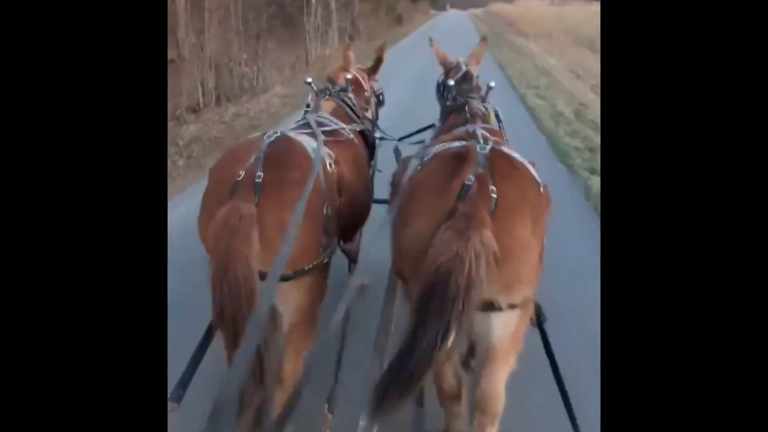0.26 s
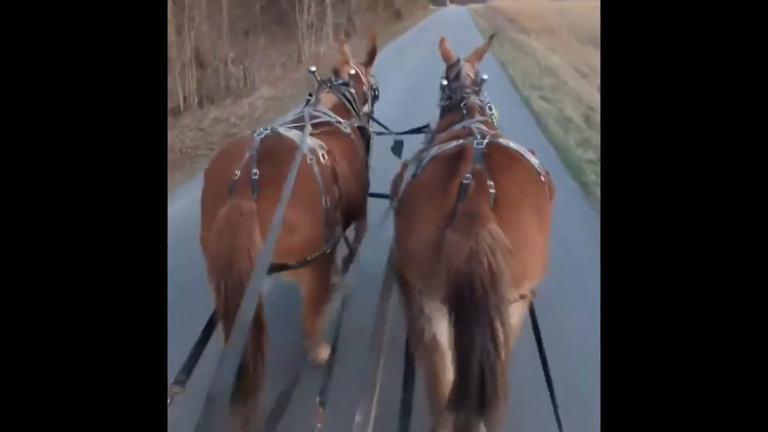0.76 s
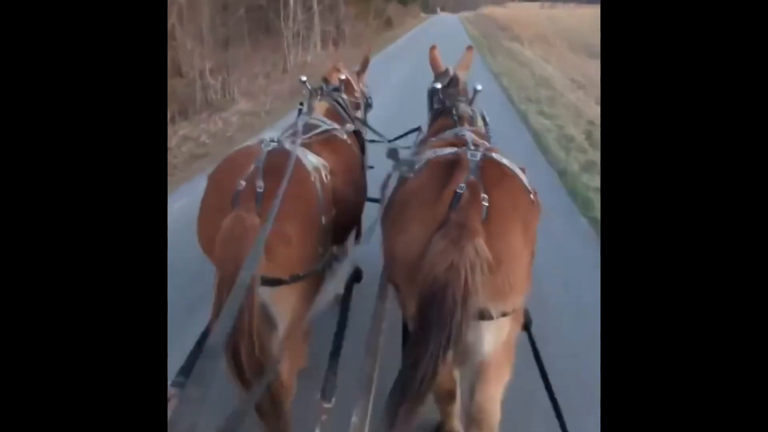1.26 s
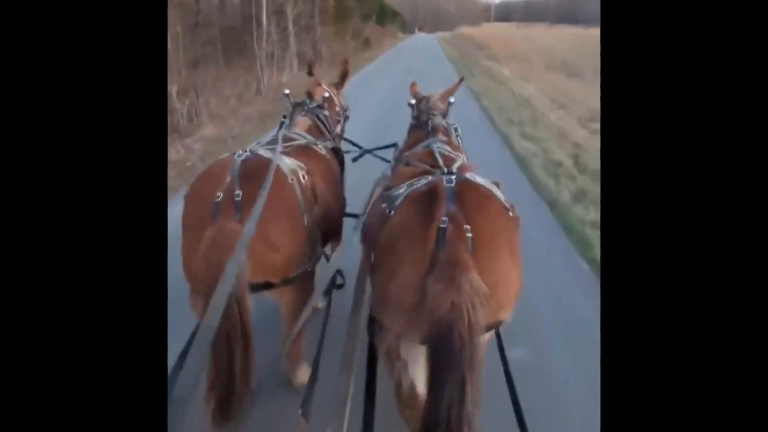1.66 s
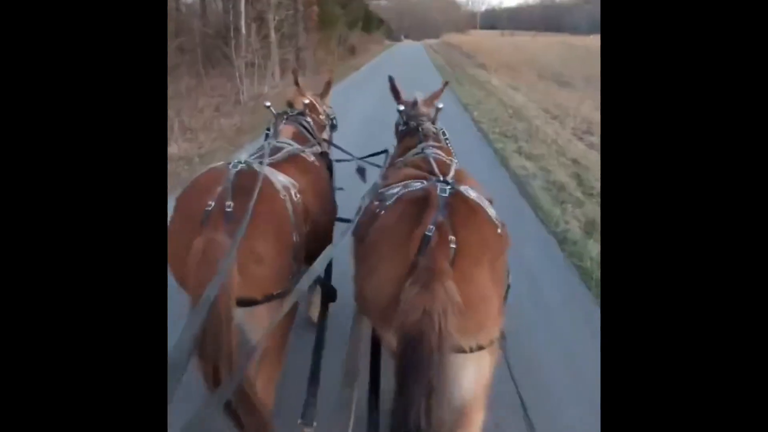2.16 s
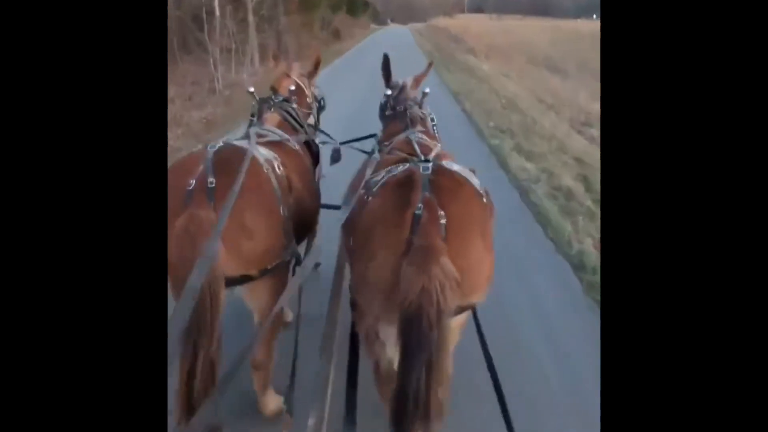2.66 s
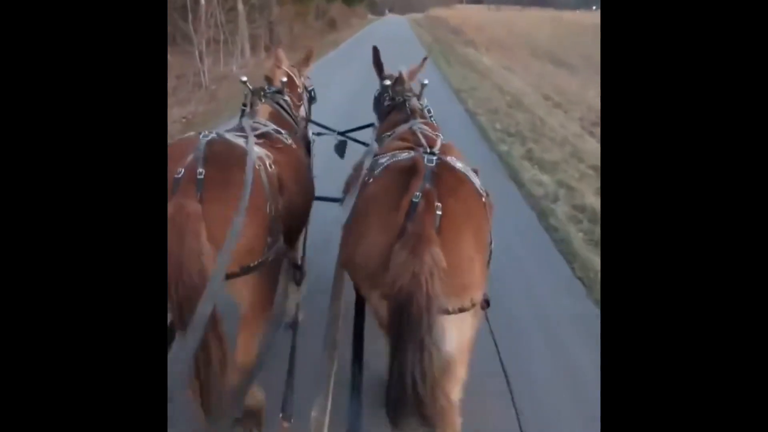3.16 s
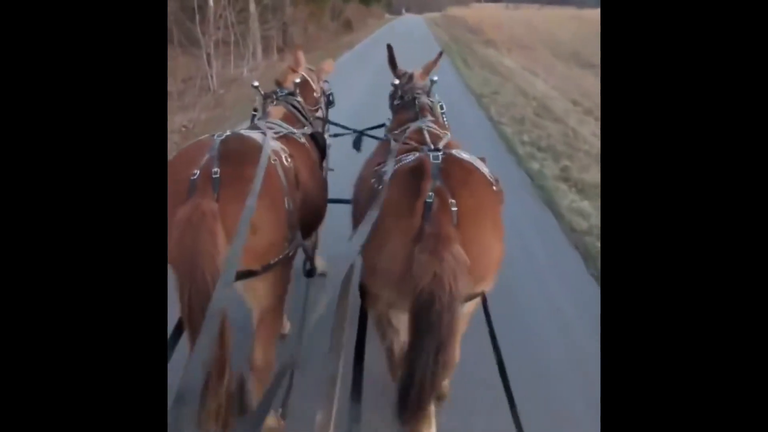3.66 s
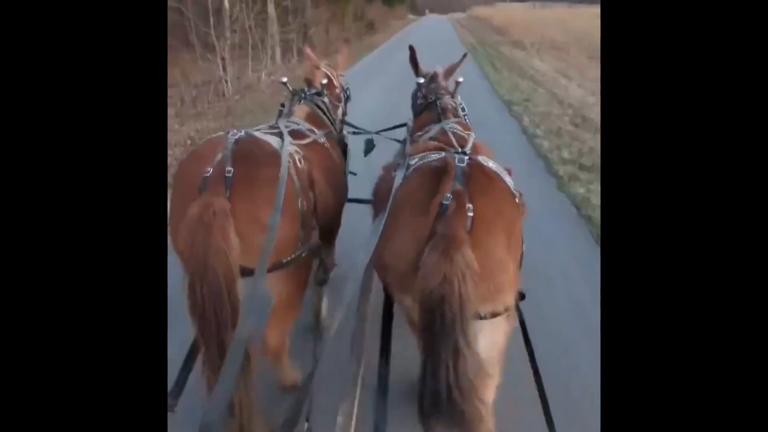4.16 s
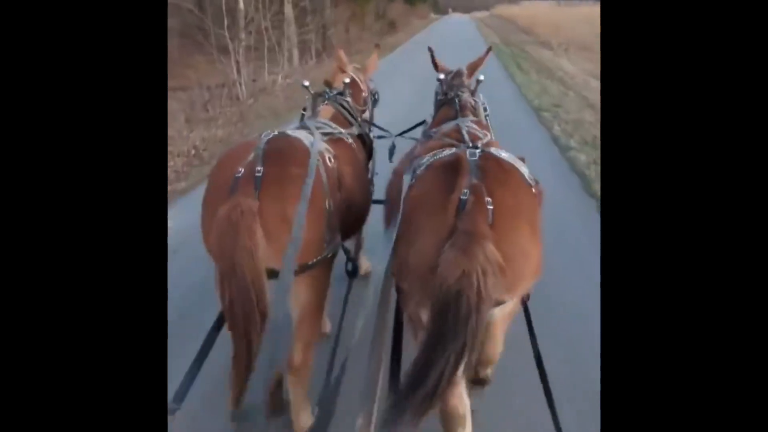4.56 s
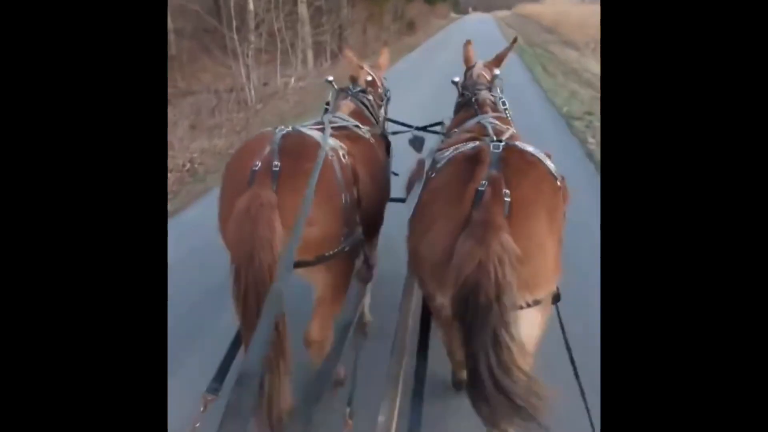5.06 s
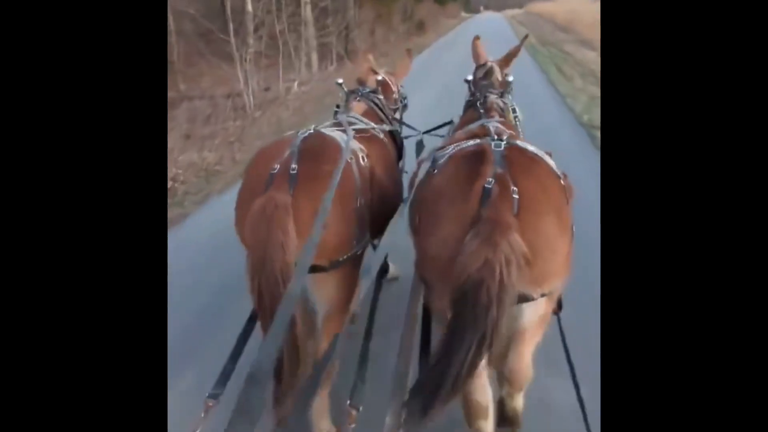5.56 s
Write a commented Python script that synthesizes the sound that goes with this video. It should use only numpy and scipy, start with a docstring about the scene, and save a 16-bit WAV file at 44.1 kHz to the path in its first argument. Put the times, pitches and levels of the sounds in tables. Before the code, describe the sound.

Close up from the cart, two shod mules trot on asphalt. Hollow, woody clops overlap in a quick, slightly uneven rhythm, with gritty skids and bright clicks of steel shoes. Wheels rumble quietly beneath and harness links tinkle. A sliding shoe squeals briefly near the start, then one hard step rings metallically around two seconds. The steps continue to the end in dry open air.

```python
"""Two shod mules trot on asphalt ahead of a cart that carries two microphones.
From the start wheels rumble and grit and harness hiss (coloured noise), and links tinkle (decaying sines).
At once the steps begin: shoes skid (noise and shoe modes), hooves clop (sines, noise), shoes click (grit noise).
At 0.8 s a sliding shoe sings (two steady close sines and a gliding partial); from 1.7 s the cart frame groans
faintly (fuzzy tones); at 1.9 s one hard blow rings a shoe (decaying steel modes). Steps go on to the end."""
import sys
import numpy as np
from scipy import signal
from scipy.fft import rfft, irfft, next_fast_len
from scipy.io import wavfile
from scipy.ndimage import uniform_filter1d

SR = 44100
rng = np.random.default_rng(int(sys.argv[2]) if len(sys.argv) > 2 else 0)


def put_to_file(sound):
    """Save the sound as 16-bit audio at rate SR, in the file named by the first command-line argument."""
    columns = np.atleast_2d(sound).T  # one column per channel
    safe = np.clip(columns, -1, 1)
    whole_steps = np.round(safe * 32767)
    wavfile.write(sys.argv[1], SR, whole_steps.astype(np.int16))


N = 255774


def amp(db):
    """Decibels to gain."""
    return 10 ** (np.asarray(db) / 20)


def evened(x):
    """Scales to rms 1."""
    return x / np.sqrt(np.mean(x ** 2) + 1e-20)


def wander(count, *sizes):
    """Slow random curve of rms 1: white noise under moving averages of the given sizes in samples."""
    x = rng.standard_normal(count)
    for size in sizes:
        x = uniform_filter1d(x, size=size)
    return evened(x)


def read(points, hz):
    """Reads a spectrum on a log-frequency axis."""
    f, value = np.transpose(points)
    return np.interp(np.log(hz + 1), np.log(f + 1), value)


def add(mix, s, sound):
    """Mixes a stereo sound in at time s."""
    part = mix[:, round(s * SR):][:, :sound.shape[1]]
    part += sound[:, :part.shape[1]]


def resonate(x, hz, width_hz):
    """Shifts the curve hz down to zero, smooths, and shifts back: a resonance of gain 1."""
    turn = np.exp(2j * np.pi * np.cumsum(hz * np.ones(x.shape[-1])) / SR)
    r = np.exp(-np.pi * width_hz / SR)
    return 2 * (turn * signal.lfilter([1 - r], [1, -r], x / turn)).real


def strike(t, rise_s, t60_s):
    """Envelope of a blow: the contact grows smoothly, then dies; top near 1."""
    rise = np.sin(np.pi / 2 * np.clip(t / rise_s, 0, 1)) ** 2
    return rise * amp(-60 * np.maximum(t - rise_s, 0) / t60_s)


def noise(colour, patchy_db, streak_db, grain_db):
    """Stereo noise of a given colour: drifting patches, narrow bands that swell and fade at random, grains."""
    # likeness of the two microphones: f/Hz, share [0-1]
    likeness = [(40, 0), (150, 1), (700, 0.4), (2000, 0.13), (3100, 0.56), (4200, 0.36), (8000, 0)]
    frames, hz = N // 256 + 5, np.fft.rfftfreq(1024, 1 / SR)
    a, b, c, d, patches, streaks = rng.standard_normal((frames, 513, 6)).T
    # axis 0 is frequency, axis 1 time
    patches = evened(uniform_filter1d(uniform_filter1d(patches, size=14, axis=0), size=5, axis=1))
    streaks = evened(uniform_filter1d(uniform_filter1d(streaks, size=2, axis=0), size=14, axis=1))
    same = np.clip(read(likeness, hz), 0, 1)[:, None]
    left = a + 1j * b
    right = same * left + np.sqrt(1 - same ** 2) * (c + 1j * d)
    lows_steady = (hz / (hz + 150))[:, None]
    gain_db = read(colour, hz)[:, None] + (patchy_db * patches + streak_db * streaks) * lows_steady
    z = np.array([left, right]) * amp(gain_db)
    hiss = signal.istft(z, nperseg=1024, noverlap=768)[1][:, :N]
    return evened(hiss * amp(grain_db * wander(N, 90)))


def steel(t, tuning=1):
    """All modes of a shoe, struck once, each at a random phase."""
    # shoe modes: f/Hz, level/dB, t60/s
    modes = [(517, -10, .22), (1876, -3, .16), (2353, -10, .1), (2632, -5.5, .3), (3852, 4, .1),
             (3954, 8, .11), (3996, 9, .1), (4040, -2, .1), (4630, 0, .12), (4714, 1, .08), (5410, -10, .5),
             (5448, -9, .4), (5468, -3, .26), (5900, -4, .13), (6380, -6, .26), (6419, -1, .19),
             (6600, -9, .25), (6800, -4, .15), (7092, -5, .11), (7327, -3, .12), (7700, -6, .12),
             (7957, -5, .22), (8044, -1, .27), (8380, -12, .12), (8970, -5, .14), (10430, -18, .2)]
    phases = rng.random(len(modes))
    return sum(amp(db - 60 * t / t60) * np.sin(2 * np.pi * (hz * tuning * t + phase))
               for (hz, db, t60), phase in zip(modes, phases))


def floor(grit):
    """Wheels rumble on the uneven road while loose grit and harness hiss."""
    # floor between steps: t/s, mean wheel rumble level/dB, grit and harness level/dB
    levels = [(0.0, -58, -64), (0.11, -45, -51), (0.58, -51, -48), (0.95, -50, -50), (1.24, -49.5, -46),
              (1.32, -46.5, -52.5), (1.45, -50, -44.5), (1.71, -49.5, -74), (1.84, -53.5, -55),
              (2.1, -44, -55), (2.39, -47, -43.5), (2.55, -46.5, -46.5), (2.99, -42.5, -47),
              (3.12, -44.5, -47), (3.39, -50, -53), (3.78, -46, -50), (3.91, -49.5, -50),
              (4.23, -50.5, -48.5), (4.59, -47, -54.5), (4.75, -47, -51.5), (4.94, -48, -48),
              (5.3, -48, -50.5), (5.64, -46.5, -45.5), (5.8, -54, -86)]
    # wheel rumble spectrum: f/Hz, relative level/dB per Hz
    rumble_colour = [(12, -46), (30, -15), (70, 2.5), (138, -6), (256, 2.5), (585, -5), (771, -3),
                     (1460, -6.5), (1920, -4), (2530, -16), (3200, -26.5), (4160, -55), (7040, -120)]
    s, rumble_db, grit_db = np.transpose(levels)
    t = np.arange(N) / SR
    rumble = noise(rumble_colour, patchy_db=4.5, streak_db=5.5, grain_db=1.0)
    lumps_db = 3.1 * wander(N, 1200, 1200)  # uneven road
    return amp(np.interp(t, s, rumble_db) + lumps_db) * rumble + amp(np.interp(t, s, grit_db)) * grit


def harness(per_s, db):
    """Buckles and chain links tinkle: short high pings of uneven size."""
    out, t = np.zeros((2, N)), np.arange(6000) / SR
    size = amp(np.minimum(rng.exponential(1, N), 4)) * (rng.random(N) < per_s / SR)
    link = rng.integers(0, 26, N)
    for k, (u, v) in enumerate(rng.random((26, 2))):
        ping = np.sin(2 * np.pi * (3500 + 6500 * u) * t) * strike(t, 0.012, 0.08 + 0.15 * v)
        out[k % 2] += signal.oaconvolve(size * (link == k), ping)[:N]
    return amp(db) * evened(out + 0.059 * out[::-1])  # slight leak to the other side


def skids(body, knock, grit):
    """Sliding steel drives hoof body, stone and snapping grit together, and stops short or dies away."""
    # skids: start t/s, turning point t/s, end t/s, then at the turning point hoof body level/dB,
    # knock level/dB and grit level/dB, last fade from there to the end/dB (negative: still growing)
    slides = [(0.027, 0.066, 0.12, -38, -35, -33, 15.5), (0.259, 0.297, 0.32, -40, -37.5, -43.5, 27),
              (0.359, 0.381, 0.43, -34, -29.5, -31.5, 18), (0.552, 0.586, 0.7, -31, -35.5, -41.5, 24),
              (0.792, 0.829, 0.94, -30, -38.5, -42.5, 44), (1.024, 1.065, 1.193, -34, -33, -34, 14.5),
              (1.181, 1.216, 1.37, -47.5, -47, -47, 3), (1.604, 1.633, 1.756, -33.5, -39, -34.5, 20),
              (1.846, 1.872, 2.08, -45, -38.5, -41, 30), (1.91, 1.917, 1.935, -40, -27, -21.5, 1.5),
              (1.926, 1.93, 2.08, -30.5, -37, -29.5, 26), (2.129, 2.144, 2.182, -39.5, -43, -33.5, -2),
              (2.396, 2.465, 2.46, -42, -43, -43, -6), (2.629, 2.659, 2.73, -30.5, -40, -37, 13.5),
              (2.73, 2.741, 2.77, -67, -36, -37, 36), (3.101, 3.139, 3.196, -32.5, -36, -35, 5.5),
              (3.323, 3.342, 3.5, -46.5, -51, -44, 10.5), (3.614, 3.631, 3.701, -36, -34, -30, 1),
              (3.696, 3.699, 3.81, -58, -45.5, -37, 17), (4.115, 4.134, 4.207, -37, -34, -36.5, 7),
              (4.196, 4.186, 4.38, -53, -46.5, -66, 12), (4.351, 4.366, 4.36, -29, -37, -39, -8),
              (5.193, 5.198, 5.34, -33, -34, -38.5, 23.5), (5.724, 5.753, 5.8, -34.5, -38.5, -33.5, 8)]
    swell_db = (12, 18, 15)  # growth from first touch to turning point: body, knock, grit
    shoe_spread, shoe_t60_s = 0.06, 0.059  # pitch varies by this share; extra damping by the road
    ring_db = -2.5  # ringing shoe re grit
    sing_hz, sing_width_hz, sing_db = (5250, 5800), 1100, -7  # climbing hiss band, level re grit
    tick_db = 2.5  # unevenness of the snapping grit
    grains_per_s, grain_db, grain_s = 450, -2.5, 0.0013  # cracking stones: rate, gain over hiss, life
    out, held = np.zeros((2, N)), np.arange(2500) / SR
    for start, turn, end, *levels_db, fade_db in slides:
        at = slice(round(start * SR), min(round(end * SR), N))
        t = np.arange(at.start, at.stop) / SR
        ends = np.clip(np.minimum(t - start, end - t) / 0.0033, 0, 1)
        shoe = steel(held, 1 + shoe_spread * (2 * rng.random() - 1)) * amp(-60 * held / shoe_t60_s)

        count = len(t) + len(held)  # lead-in for the ringing
        snaps = amp(tick_db * np.tanh(wander(count, 60)))
        stones = (rng.random(count) < grains_per_s / SR) * np.minimum(rng.exponential(1, count), 2.2)
        cracks = signal.lfilter([1], [1, -np.exp(-1 / (grain_s * SR))], stones)
        snaps = snaps * (1 + amp(grain_db) * cracks)
        drive = snaps * rng.standard_normal((1, count))
        ringing = signal.fftconvolve(drive, shoe[None], "valid")[:, :len(t)]

        snaps = snaps[len(held):]
        crackle = grit[:, at] * snaps
        singing = resonate(crackle, np.interp(t, (start, end), sing_hz), sing_width_hz)
        bright = evened(crackle) + amp(ring_db) * evened(ringing) + amp(sing_db) * evened(singing)
        layers = (body[:, at] * np.sqrt(snaps), knock[:, at] * snaps, bright)
        for db, grow_db, layer in zip(levels_db, swell_db, layers):
            level_db = db - np.interp(t, (start, turn, end), (grow_db, 0, fade_db))
            out[:, at] += amp(level_db) * ends * evened(layer)
    return out


def clops(body, knock):
    """The hollow hoof lands and rings a few cycles at its own pitch over a thud and a stony knock."""
    # hoof blows: t/s, nominal peak level/dB, hollow pitch f/Hz, thud level/dB and knock level/dB # (both re
    # peak, before layer gains), decay scale/s (hollow, loose and knock layers take a multiple; # thud and graze
    # decay at fixed rates)
    blows = [(0.042, -22, 1030, -24, 1, 0.012), (0.068, -21, 953, -15, -18, 0.027),
             (0.147, -16.5, 1170, -18, 2.5, 0.018), (0.171, -22.5, 856, -7.5, -2, 0.045),
             (0.291, -31, 798, -6, -25, 0.054), (0.3749, -24.5, 694, -5, -14, 0.012),
             (0.381, -6, 916, -35, -6, 0.013), (0.3923, -22, 964, -22, -5, 0.014),
             (0.571, -27, 960, -15, -20, 0.048), (0.584, -24, 830, -6, -12, 0.016),
             (0.589, -11, 864, -13, -22, 0.019), (0.709, -34.5, 690, -10, 1, 0.035),
             (0.822, -15, 780, -5.5, -26, 0.0085), (1.036, -18.5, 1200, -16, -17, 0.013),
             (1.0615, -16, 870, -15, -19, 0.019), (1.115, -29.5, 946, -4, -19, 0.048),
             (1.256, -11.5, 903, -21, 5, 0.0049), (1.2607, -13.5, 922, -22, -1, 0.019),
             (1.2735, -23.5, 930, -8, 7, 0.025), (1.337, -17.5, 630, -26, 3, 0.0068),
             (1.36, -17, 810, -21, -9, 0.012), (1.624, -25.5, 800, -22, 3, 0.045),
             (1.6396, -11.5, 903, -23, 3, 0.019), (1.702, -29, 504, -1.5, -12, 0.12),
             (1.871, -29, 1230, -7, -2, 0.029), (1.894, -26.5, 805, -10, -19, 0.013),
             (1.917, -24, 557, -6, 18, 0.011), (1.942, -25.5, 845, -9, -3, 0.015),
             (2.1309, -13, 919, -19, -4, 0.023), (2.1347, -21, 854, -18, 1, 0.023),
             (2.146, -26.5, 912, -4, 0, 0.049), (2.345, -35.5, 957, -6, 2, 0.049),
             (2.393, -26, 728, -8, -3, 0.025), (2.571, -23.5, 677, -5, -32, 0.04),
             (2.638, -34, 780, -17, 4, 0.082), (2.652, -40, 745, -13, 10, 0.06),
             (2.68, -25, 820, -8, -14, 0.025), (2.791, -26, 757, -9, 10, 0.05),
             (2.812, -22.5, 825, -10, 0.5, 0.019), (2.865, -32, 1200, -32, 7.5, 0.052),
             (2.8824, -12.5, 870, -17.5, -12, 0.018), (2.995, -14, 868, -21, 0.5, 0.027),
             (3.0024, -9.5, 928, -27, -7.5, 0.026), (3.0905, -19, 886, -10, 6, 0.029),
             (3.374, -20, 774, -17, -6, 0.015), (3.461, -24.5, 670, -0.5, -32, 0.038),
             (3.622, -31, 877, -21, -9, 0.077), (3.64, -18, 835, -27, -10, 0.013),
             (3.6462, -11.5, 887, -24, -16, 0.021), (3.652, -18, 885, -33, -11, 0.024),
             (3.66, -17, 885, -38, -13, 0.031), (3.666, -30, 900, -39, -15, 0.019),
             (3.692, -26, 1230, -20, 9, 0.017), (3.874, -14, 798, -10.5, -3.5, 0.02),
             (3.907, -12.5, 1010, -12.5, -7.5, 0.03), (3.9103, -23, 950, -13, -3, 0.015),
             (3.921, -29, 908, -4, 1, 0.066), (4.1295, -27, 1200, -7, 5, 0.016),
             (4.149, -32, 710, 0, 6, 0.022), (4.372, -18.5, 710, -12.5, -6, 0.026),
             (4.574, -25.5, 1194, -8, 3, 0.035), (4.594, -22.5, 778, -14, 6, 0.019),
             (4.6951, -9.5, 909, -18.5, -5.5, 0.02), (4.705, -27.5, 907, -19, -1, 0.053),
             (4.821, -11.5, 940, -38, -8, 0.014), (4.8261, -5, 907, -35, -6, 0.018),
             (4.8373, -32, 915, -18, -15, 0.03), (4.913, -28.5, 1111, -8, 5.5, 0.057),
             (4.94, -21.5, 798, -15, -2, 0.016), (5.041, -32, 1030, -2.5, 2, 0.018),
             (5.093, -32, 860, -24, -21, 0.016), (5.197, -33.5, 716, -21, 9.5, 0.071),
             (5.278, -27.5, 643, 1, -32, 0.053), (5.309, -28.5, 620, -3.5, -27, 0.022),
             (5.387, -29.5, 1140, -7.5, -12, 0.013), (5.481, -20.5, 1120, -16, -3, 0.043),
             (5.509, -20, 885, -13, 5, 0.025), (5.721, -16, 946, -27, 7, 0.015),
             (5.7271, -7, 927, -32, -24, 0.022), (5.7585, -17, 909, -22, -11, 0.043)]
    touch_db, touch_s = -21, 0.005325  # graze before landing: level re blow, lead
    push_db, push_law, push_s = -28.5, 1.76, 0.0031  # air puff: gain at 0 dB, dB per dB of blow, time scale
    low_cut_hz = 130
    out, push, t = np.zeros((2, N)), np.zeros((2, N)), np.arange(5000) / SR
    x = t / push_s
    puff = np.tile((1 - x / 2) * x * np.exp(1 - x), (2, 1))
    chance = rng.random((len(blows), 3))
    for (s, db, hz, thud_db, knock_db, decay_s), (u, v, w) in zip(blows, chance):
        at = round(s * SR)
        ring = 0.72 * strike(t, 0.0019, 0.43 * decay_s) + 0.13 * strike(t, 0.0033, 4.5 * decay_s)
        hollow = np.sin(2 * np.pi * hz * t) * ring
        lower_hz = hz * (0.712 + 0.1 * u)
        hollow += 0.17 * np.sin(2 * np.pi * (lower_hz * t + v)) * strike(t, 0.0012, 1.35 * decay_s)
        thud = np.sin(2 * np.pi * (200 + 120 * w) * t) * strike(t, 0.0025, 0.021)

        scatter = evened(body[:, at:at + 5000])  # off legs and road
        span = scatter.shape[1]
        near = t[:span]
        loose = 0.12 * scatter * strike(near, 0.0048, 3.63 * decay_s)
        stony = evened(knock[:, at:at + span]) * strike(near, 0.0011, 1.64 * decay_s)
        stony *= 0.37 * amp(knock_db)

        add(out, s, amp(db) * ((hollow + amp(thud_db) * thud)[:span] + loose + stony))
        add(push, s, amp(push_law * db + push_db) * puff)
        add(out, s - touch_s, amp(db + touch_db) * scatter * strike(near, touch_s, 0.023))
    return signal.lfilter(*signal.butter(2, low_cut_hz, "high", fs=SR), out) + push


def clicks(grit):
    """Steel on stone: a short spit of grit, brightest where the shoe bites."""
    # clicks: t/s, nominal peak level/dB (before a gain of 0.5), brightest f/Hz, decay scale/s (x 0.84 = t60)
    bites = [(0.044, -27, 7630, 0.025), (0.089, -18.5, 5100, 0.1), (0.146, -23, 4300, 0.11),
             (0.17, -16.5, 5900, 0.016), (0.381, -19.5, 6130, 0.056), (0.444, -20.5, 6200, 0.03),
             (0.486, -30.5, 6400, 0.05), (0.53, -32, 6500, 0.048), (0.5676, -32.5, 5430, 0.065),
             (0.6583, -20.5, 5800, 0.083), (0.822, -32, 6000, 0.02), (0.918, -33, 6450, 0.027),
             (0.955, -22.5, 6100, 0.01), (0.9857, -24.5, 6550, 0.03), (1.034, -20.5, 4570, 0.063),
             (1.057, -21, 7170, 0.016), (1.06, -15.5, 4020, 0.015), (1.13, -19, 5350, 0.02),
             (1.259, -15, 3640, 0.056), (1.36, -27, 4770, 0.045), (1.622, -24.5, 5160, 0.05),
             (1.64, -25, 5800, 0.021), (1.854, -30.5, 6000, 0.051), (1.913, -5, 2850, 0.046),
             (1.9153, -7, 5400, 0.016), (1.922, -3.5, 3830, 0.044), (2.131, -20.5, 5970, 0.03),
             (2.174, -19, 4440, 0.085), (2.296, -33, 6600, 0.031), (2.429, -26.5, 4350, 0.091),
             (2.6374, -23, 5160, 0.066), (2.651, -19.5, 3780, 0.13), (2.7438, -20.5, 8330, 0.047),
             (2.792, -15.5, 7730, 0.047), (2.809, -15, 3970, 0.06), (3.0017, -20.5, 5440, 0.078),
             (3.0893, -12, 5340, 0.017), (3.09, -14, 2900, 0.033), (3.096, -17, 7900, 0.023),
             (3.102, -19, 4600, 0.11), (3.1682, -17, 4160, 0.067), (3.542, -31, 6430, 0.012),
             (3.59, -30.5, 7300, 0.19), (3.629, -34, 5950, 0.024), (3.646, -22, 5420, 0.05),
             (3.908, -22, 6100, 0.041), (3.9406, -29, 4680, 0.11), (4.129, -23.5, 5550, 0.029),
             (4.149, -21.5, 4040, 0.062), (4.174, -20, 4250, 0.034), (4.185, -27, 4350, 0.03),
             (4.494, -32.5, 6100, 0.037), (4.557, -31, 9600, 0.068), (4.571, -15.5, 5370, 0.033),
             (4.592, -16.5, 4300, 0.051), (4.672, -30, 4830, 0.18), (4.691, -28.5, 5640, 0.093),
             (4.799, -31.5, 3900, 0.061), (4.819, -17, 5600, 0.013), (4.8237, -11, 5100, 0.011),
             (4.8275, -13.5, 4250, 0.068), (5.199, -30, 5470, 0.05), (5.221, -24, 4640, 0.19),
             (5.402, -27, 6150, 0.017), (5.504, -12, 4370, 0.029), (5.508, -8.5, 4020, 0.012),
             (5.7232, -23.5, 4450, 0.12)]
    out, t = np.zeros((2, N)), np.arange(4000) / SR
    for s, db, hz, decay_s in bites:
        spit = grit[:, round(s * SR):][:, :4000]
        spit = 0.3 * spit + 1.49 * resonate(resonate(spit, hz, 530), hz, 530)
        spit = spit / np.std(spit[:, :500])  # the table sets the strength of the bite
        envelope = strike(t[:spit.shape[1]], 0.0031, 0.84 * decay_s)
        add(out, s - 0.002, 0.5 * amp(db) * spit * envelope)
    return out


def squeal():
    """Stick-slip locks to a pair of steel modes, with a slightly rough partial climbing above."""
    # two close modes of a sliding shoe: t/s, lower level/dB, upper level/dB (rms)
    pair = [(0.794, -59, -60), (.812, -35, -44), (0.829, -33, -56), (0.834, -37, -36), (.842, -50, -25),
            (.856, -37, -33), (0.869, -28, -41), (.875, -36, -47), (.892, -35, -58), (0.905, -50, -70)]
    # climbing upper partial: t/s, f/Hz, level/dB (rms, before flutter)
    overtone = [(.794, 4700, -56), (0.816, 4800, -46), (.824, 5120, -52), (.836, 5250, -45),
                (.854, 5100, -48), (.86, 5130, -54), (.864, 5420, -43), (.872, 5380, -34.5),
                (.882, 5390, -47), (.904, 5070, -58)]
    pair_hz = (2566, 2638)
    s, *levels_db = np.transpose(pair)
    t = np.arange(s[0], s[-1], 1 / SR)
    tone = sum(amp(np.interp(t, s, db)) * np.sin(2 * np.pi * hz * t) for hz, db in zip(pair_hz, levels_db))
    at, hz, db = np.transpose(overtone)
    flutter = 1 + 0.31 * wander(len(t), 120)
    phase = 2 * np.pi * np.cumsum(np.interp(t, at, hz)) / SR
    upper = amp(np.interp(t, at, db)) * flutter * np.sin(phase)
    out = np.zeros((2, N))
    add(out, s[0], np.tile(np.sqrt(2) * (tone + upper), (2, 1)))
    return out


def groans():
    """The cart frame groans faintly: short fuzzy tones that swell and fade."""
    # groans: start t/s, end t/s, f/Hz, sine peak level/dB, left-right level/dB
    creaks = [(1.7, 1.77, 1540, -44, 0), (1.96, 2.3, 275, -50, 0), (2.13, 2.36, 200, -51, 0),
              (3.06, 3.17, 385, -44, 10)]
    out = np.zeros((2, N))
    for start, end, hz, db, pan_db in creaks:
        t = np.arange(start, end, 1 / SR)
        fuzz = evened(resonate(resonate(rng.standard_normal(len(t)), hz, 40), hz, 40))
        tone = np.sin(2 * np.pi * hz * t) + 0.6 * fuzz
        sides = amp([[pan_db / 2], [-pan_db / 2]])
        add(out, start, amp(db) * sides * tone * signal.windows.tukey(len(t), 0.6))
    return out


def clank():
    """One hard blow sets all steel modes ringing; close pairs beat."""
    start_s, level_db = 1.915, -21.5
    left_lag = 17  # samples; this shoe lands farther to the right
    out, t = np.zeros((2, N)), np.arange(18000) / SR
    add(out, start_s, np.tile(amp(level_db) * steel(t) * (1 - np.exp(-t / 0.002)), (2, 1)))
    out *= amp(1.5 * wander(N, 350))  # the road damps it unevenly
    out[0] = np.roll(out[0], left_lag)
    return out


def scene():
    """All sources; the left microphone is a little farther from the hooves."""
    # hoof body spectrum: f/Hz, relative level/dB per Hz
    body_colour = [(71, -43), (120, -36), (301, -9.5), (567, -11.5), (830, 0.5), (913, -2), (1160, -7.5),
                   (1500, -27.5), (1950, -10.5), (3300, -120)]
    # stony knock spectrum: f/Hz, relative level/dB per Hz
    knock_colour = [(760, -39), (1300, -7), (1730, -2), (1900, -1.5), (2570, -8.5), (3050, -20),
                    (3300, -12), (4290, -12.5), (7260, -120)]
    # grit spectrum: f/Hz, relative level/dB per Hz
    grit_colour = [(1760, -24), (3000, -6.5), (3940, -2.5), (5020, -6.5), (5460, -3), (7130, -2.5),
                   (7980, -6), (9090, -8.5), (9590, -12.5), (10700, -13), (12400, -45), (22000, -120)]
    left_lag = 7  # samples; floor and harness share it
    body = noise(body_colour, patchy_db=4, streak_db=2.5, grain_db=2.0)
    knock = noise(knock_colour, patchy_db=1.0, streak_db=7.0, grain_db=1.0)
    grit = noise(grit_colour, patchy_db=6.0, streak_db=4.0, grain_db=1.5)
    bite = noise(grit_colour, patchy_db=3.0, streak_db=5.5, grain_db=1.5)
    mix = floor(grit) + harness(per_s=140, db=-57.5)
    mix += skids(body, knock, bite) + clops(body, knock) + clicks(bite)
    mix[0] = np.roll(mix[0], left_lag)
    return mix + squeal() + groans() + clank()


def record(dry):
    """The housing shades each microphone differently; peaks saturate softly; then the band limit."""
    # housing shadow: f/Hz, left-right level/dB
    lean = [(60, -1), (140, -1.5), (200, -1), (310, 1), (460, -7.5), (690, 3.5), (1040, -0.5), (1560, -2),
            (2340, 0), (3520, 1.5), (5280, -15), (7930, -2.5), (11900, 3)]
    # response of both microphones: f/Hz, level/dB
    response = [(2300, 1), (3100, 1.5), (3900, -1.5), (10300, 0.5), (11300, -5), (12500, -17)]
    ceiling, edge_hz = 0.97, 12500
    size = next_fast_len(N + 2048)
    hz = np.fft.rfftfreq(size, 1 / SR)
    lean_db, response_db = read(lean, hz), read(response, hz)
    sides = amp([response_db + lean_db / 2, response_db - lean_db / 2])
    shaded = irfft(rfft(dry, size) * sides, size)[:, :N]
    soft = ceiling * np.tanh(shaded / ceiling)
    low_pass = signal.firwin(511, edge_hz, window=("kaiser", 9), fs=SR)
    return signal.oaconvolve(soft, low_pass[None], "same")


dry = scene()
out = record(dry)
put_to_file(out)
```